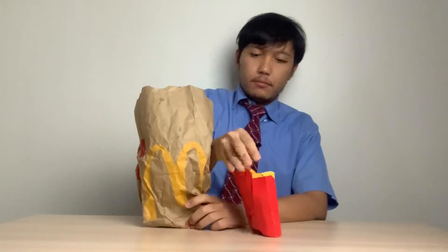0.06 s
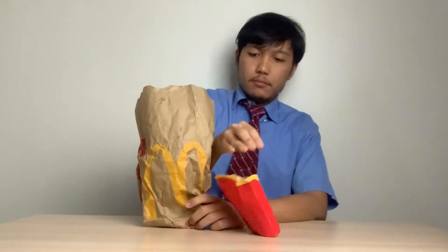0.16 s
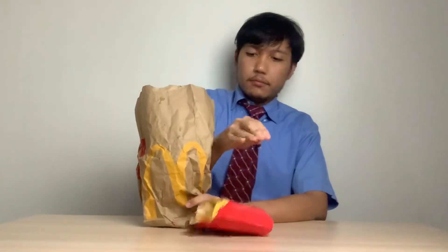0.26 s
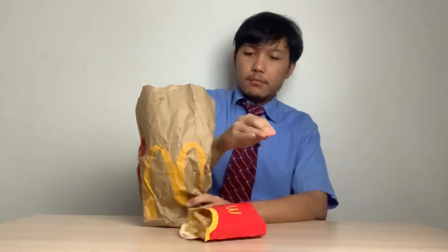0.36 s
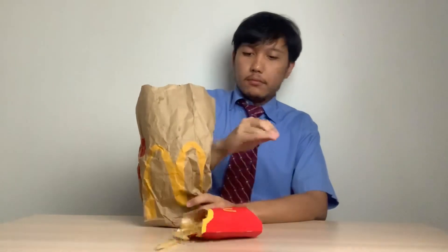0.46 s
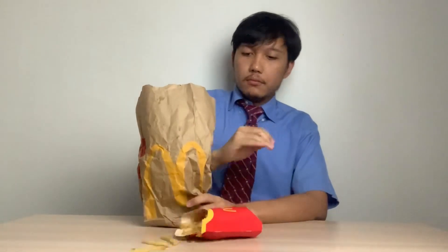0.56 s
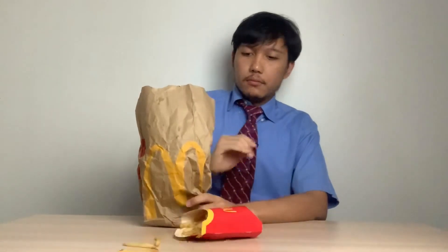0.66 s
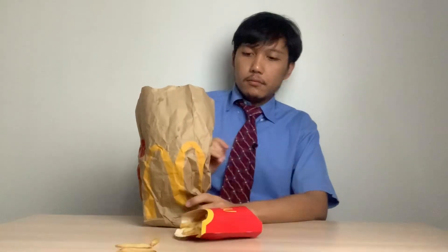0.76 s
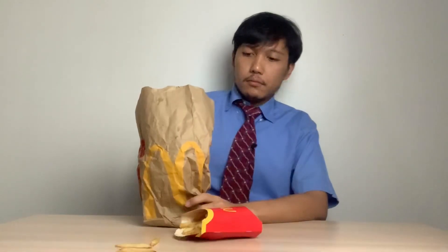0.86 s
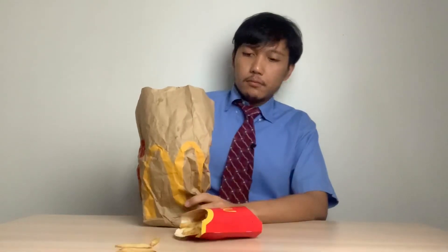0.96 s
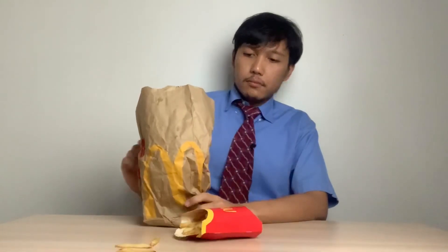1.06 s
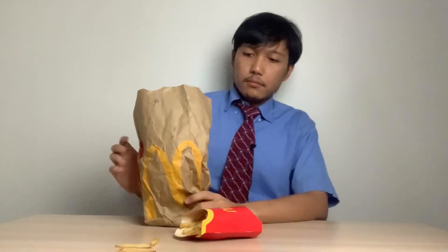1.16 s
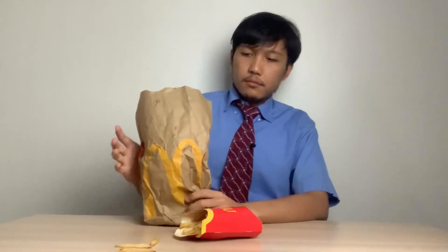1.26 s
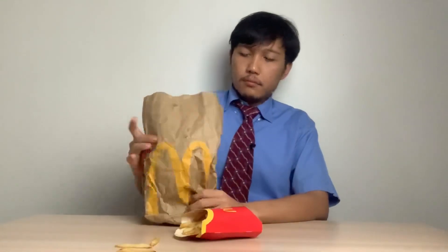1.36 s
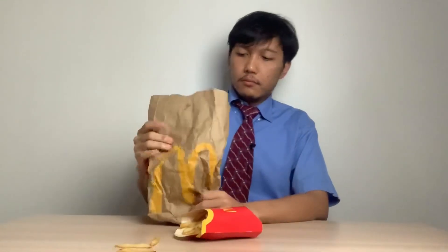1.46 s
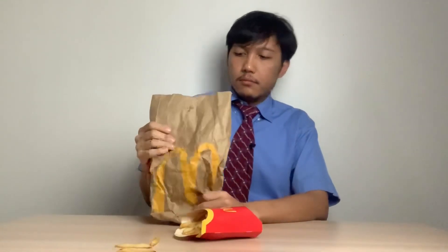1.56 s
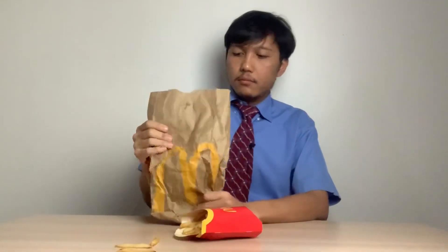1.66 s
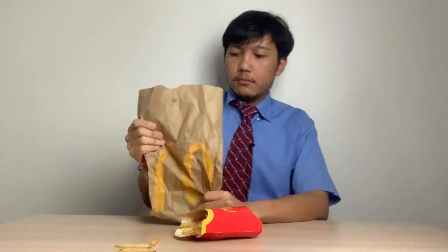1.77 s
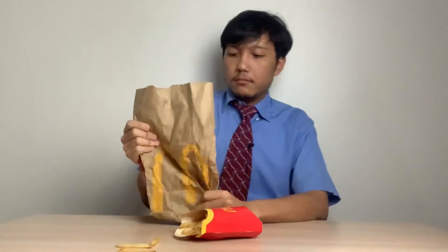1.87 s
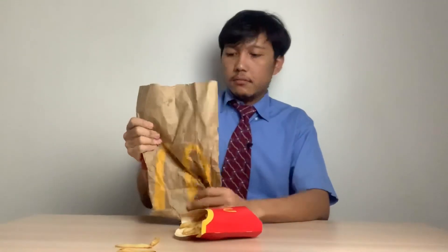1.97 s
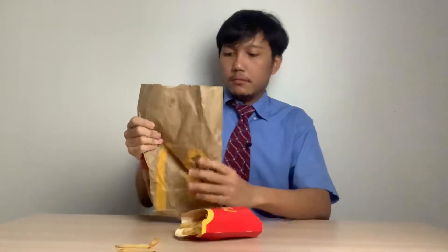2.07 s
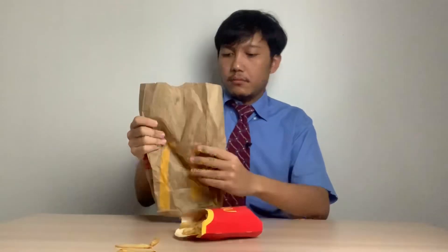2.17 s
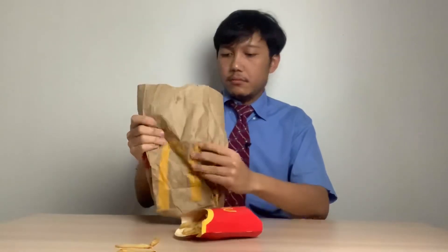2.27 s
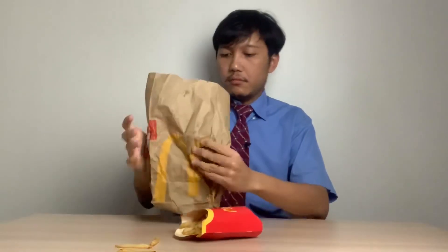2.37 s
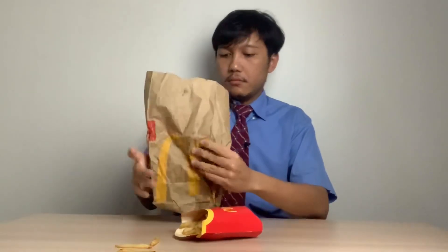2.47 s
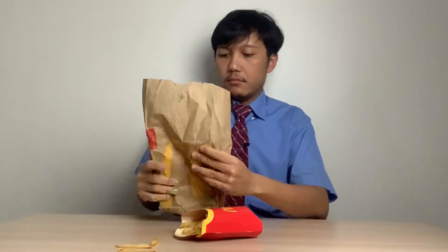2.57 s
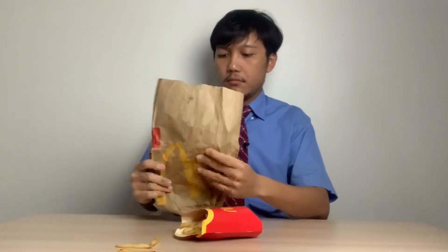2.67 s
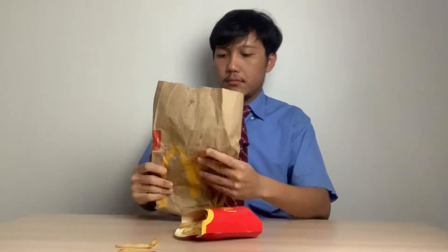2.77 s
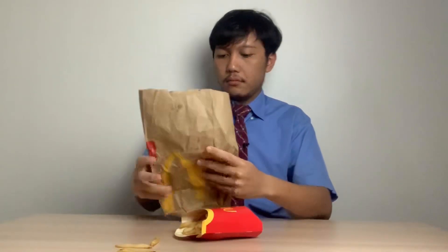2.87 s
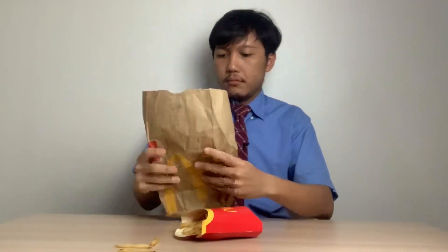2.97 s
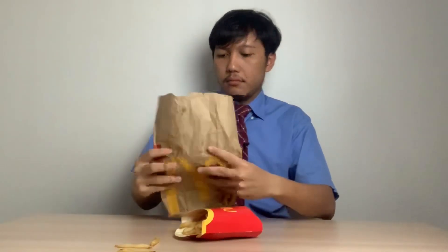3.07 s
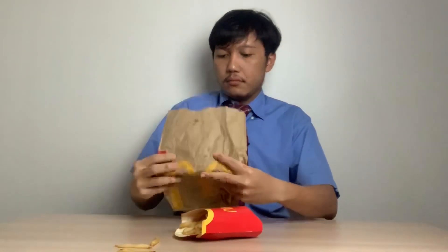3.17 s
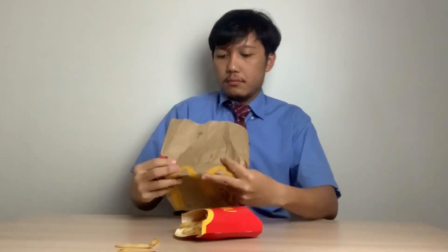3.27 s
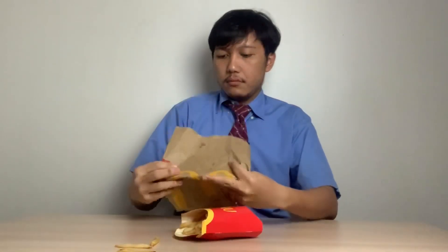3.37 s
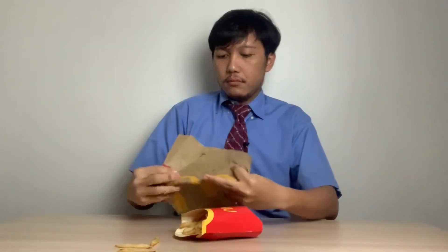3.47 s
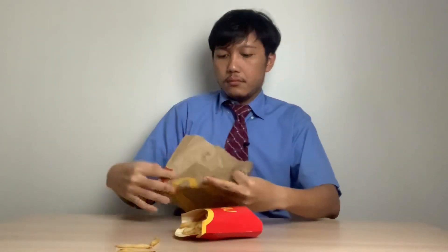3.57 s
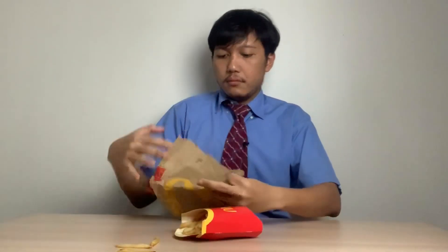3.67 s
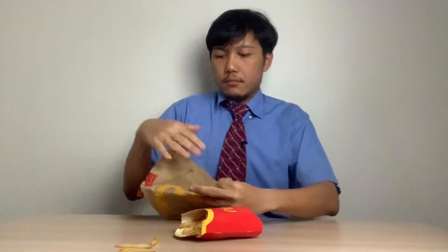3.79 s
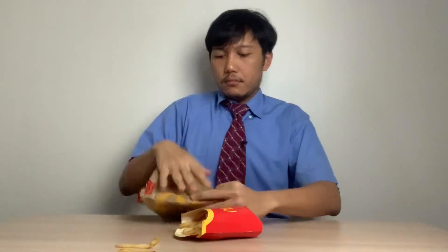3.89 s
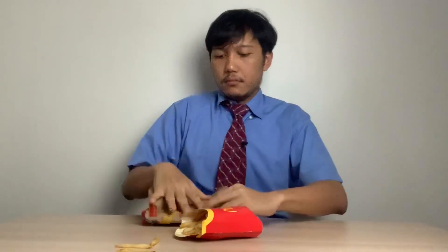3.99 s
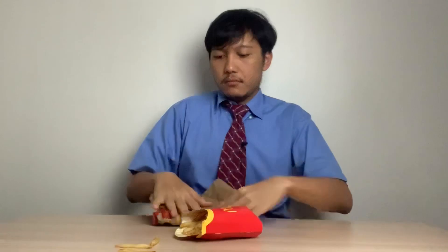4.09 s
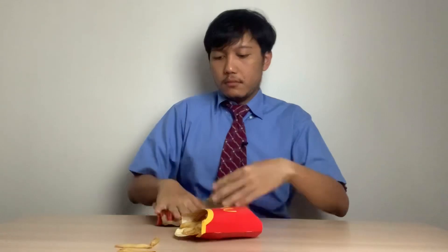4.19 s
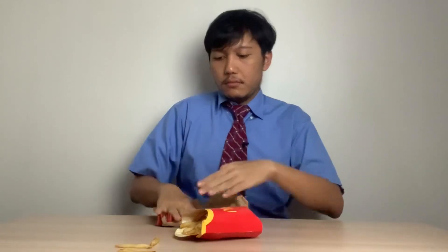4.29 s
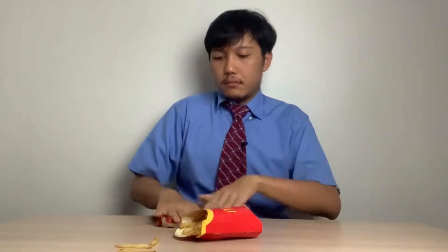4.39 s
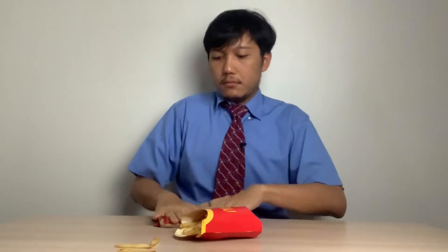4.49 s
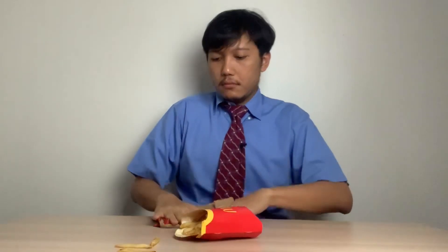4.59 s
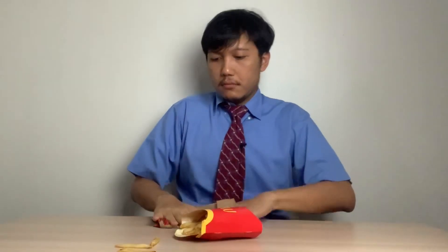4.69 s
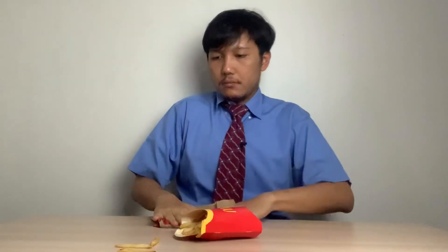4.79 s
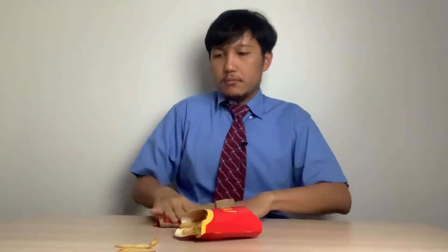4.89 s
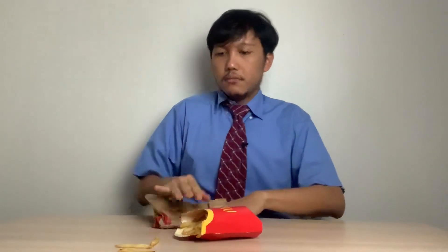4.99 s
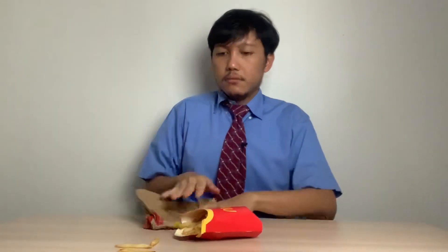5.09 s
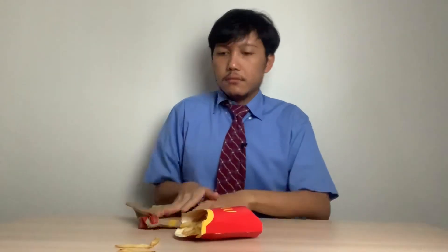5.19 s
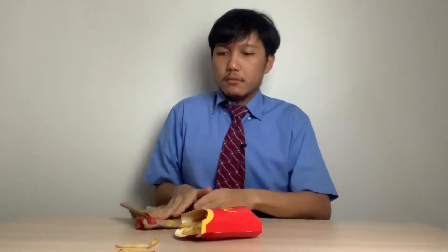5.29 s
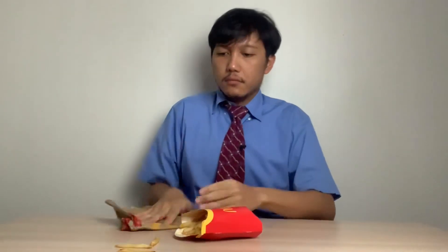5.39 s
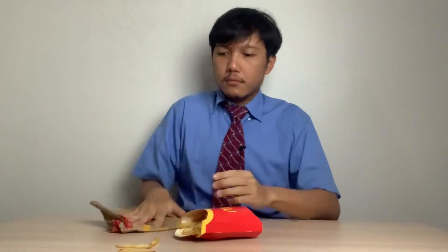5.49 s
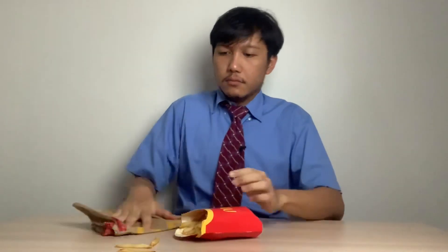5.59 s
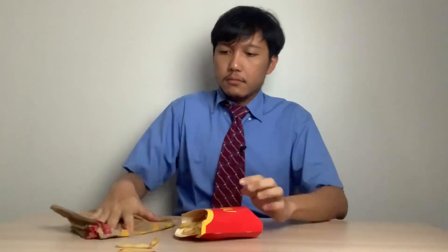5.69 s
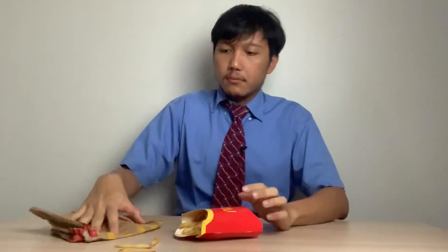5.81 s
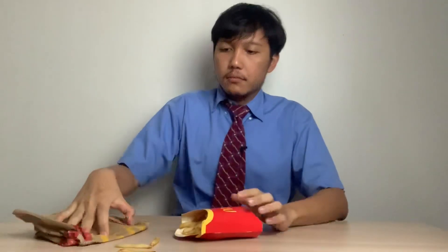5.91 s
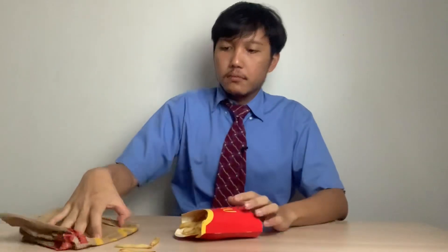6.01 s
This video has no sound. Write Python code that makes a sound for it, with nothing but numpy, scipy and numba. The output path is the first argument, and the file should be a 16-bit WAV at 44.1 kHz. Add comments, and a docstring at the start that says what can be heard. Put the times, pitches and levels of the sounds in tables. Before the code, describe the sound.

A small carton of fries topples on a wooden table with a quick papery clatter and low knock. After a near-silent pause, a stiff paper bag is grabbed with sharp snaps, crumpled in loud bursts, folded down and pressed flat with soft table thumps, then slid away with a dry rub. Small quiet room, close single microphone with bright crackle, faint low hum and rumble.

```python
"""Fries tip over, then a paper bag is folded and slid away

A carton of fries tips over on a wooden table; then a stiff paper bag is gripped, folded, pressed flat
and slid away. Short decaying tones make the creases: single snaps and dense flurries of buckles.
Others make the boom of the table and the scrape of the flat bag. A noise tail gives the paper a small room.
A sine hum, a low rumble and air noise run throughout. One microphone with a bright peak hears it all.
"""
import sys
import numpy as np
from scipy import signal
from scipy.fft import rfft, irfft, next_fast_len
from scipy.io import wavfile
from scipy.ndimage import uniform_filter1d
from numba import njit

SR = 44100
rng = np.random.default_rng(int(sys.argv[2]) if len(sys.argv) > 2 else 0)


def file_out(sig):
    """Save sig as 16-bit WAV at sys.argv[1]."""
    # one column per channel
    cols = np.atleast_2d(sig).T
    # limit, then scale
    lim = np.clip(cols, -1, 1)
    pcm = np.round(lim * 32767).astype(np.int16)
    wavfile.write(sys.argv[1], SR, pcm)


N = 266805  # length in samples

# steady low hum of an appliance: pitch_hz, rms_level_db
HUM = [(48.4, -40)]
# slowly wavering level of the low rumble: time_s, level_db
RUMBLE_LEVEL = [(0, -41.5), (.23, -40.5), (.7, -35), (.93, -44), (1.3, -32.5), (1.75, -45), (2.48, -26),
                (2.8, -35.5), (3.93, -32.5), (4.23, -36), (5.35, -30), (6.05, -30)]
# tone colour of the rumble: frequency_hz, relative_level_db
RUMBLE_COLOUR = [(10, -0.5), (20, 15), (38, 1), (50, -3), (62, -24), (90, -39.5)]
# tone colour of the air noise: frequency_hz, relative_level_db
AIR_COLOUR = [(50, 1), (80, 3), (140, 10), (300, -2), (900, -15), (2000, -32), (8000, -39), (15000, -28)]
# ringing tones of the wooden table top: pitch_hz, relative_level_db, time_to_fall_60_db_s
TABLE_MODES = [(130.6, -5, 0.64), (203, -15, 0.23), (313, -4.5, 0.061)]
# knocks on the table: start_s, level_db
KNOCKS = [(0.184, -25.5), (0.234, -20.5), (0.28, -53), (0.348, -55), (0.471, -43), (3.967, -31),
          (4.228, -31), (4.348, -31), (4.706, -38), (5.349, -31), (5.8, -41.5)]
# flattened bag scraping the table: time_s, level_db
SCRAPE_LEVEL = [(3.7, -39), (3.88, -33), (4.2, -32), (4.26, -40), (4.33, -34), (4.68, -33.5), (4.73, -46.5),
                (4.85, -38), (5.0, -41), (5.15, -35.5), (5.36, -34), (5.47, -37), (5.7, -43), (6.05, -45)]
# flurries of buckling; swell and fade set how fast the level moves by 20 dB, body is how much big folds join in:
# peak_s, peak_level_db, swell_s, fade_s, body_db
FLURRIES = [(0.249, -31, 0.031, 0.11, 2), (.347, -40.5, 0.0048, 0.3, 2.5), (.462, -38, 0.0049, 0.082, -3.5),
            (1.179, -49.5, 0.0041, 0.26, 5), (1.253, -28.5, 0.011, 0.041, 1.5),
            (1.329, -38.5, 0.0095, .08, 5.5), (1.376, -34, 0.055, 0.087, 6.5), (1.457, -33, 0.018, 0.14, 3),
            (1.526, -35.5, 0.0076, 0.15, 1), (1.636, -22.5, 0.023, 0.12, 2.5),
            (1.672, -24, 0.057, 0.058, 3.5), (1.71, -18.5, 0.037, .035, 0.5),
            (1.732, -14.5, 0.029, 0.048, -3), (1.886, -31.5, 0.12, 0.15, 0), (2.022, -44, .004, 0.04, -1),
            (2.102, -36.5, 0.17, 0.11, 1), (2.161, -41, .005, .07, 7), (2.277, -36, 0.54, 0.099, -0.5),
            (2.349, -31.5, 0.005, 0.29, 1), (2.493, -25.5, 0.023, 0.084, 0.5), (2.57, -25.5, 0.082, .04, 3),
            (2.603, -15.5, 0.062, 0.045, -0.5), (2.805, -35.5, 0.67, 0.051, 2),
            (2.92, -38, 0.15, 0.11, 2.5), (2.964, -30.5, .04, 0.47, 4.5), (2.99, -25.5, 0.044, 0.037, -2),
            (3.03, -17, 0.044, 0.051, -3), (3.072, -22.5, 0.06, 0.077, -6),
            (3.218, -22, 0.035, 0.036, -3.5), (3.27, -35.5, 0.024, .06, 2.5),
            (3.321, -30, 0.094, 0.055, 0.5), (3.386, -46, .005, .07, -8), (3.42, -34, 0.0057, .15, -20),
            (3.483, -21, 0.079, 0.096, -10), (3.541, -30.5, 0.18, 0.036, 2.5),
            (3.636, -31.5, .005, 0.087, 0), (3.772, -30, .006, 0.035, -11), (3.813, -25, 0.019, 0.14, -4),
            (3.891, -27.5, 0.086, 0.19, 3), (4.092, -22.5, 0.56, 0.22, 0.5), (4.217, -33, 0.14, 0.34, 6.5),
            (4.357, -20.5, 0.085, 0.13, 5), (4.498, -20.5, 0.096, 0.044, 1),
            (4.571, -26.5, 0.085, 0.28, 2.5), (4.648, -37, 0.15, 0.062, 4), (4.703, -35, 0.1, 0.039, 0),
            (4.815, -31.5, 0.012, 0.6, 3.5), (4.993, -30.5, 0.36, 0.51, -24),
            (5.177, -28.5, 0.062, 0.069, 1.5), (5.286, -37, .01, 0.29, 13), (5.345, -24.5, 0.2, 0.26, -12),
            (5.716, -25, 0.017, 0.043, -6)]
# quiet rubbing between flurries, as fries settle, hands hold the bag and it slides away:
# time_s, level_db, body_db
RUBBING = [(0, -57, -2), (.06, -70, 9), (.17, -64, 7), (.5, -44.5, 3.5), (.7, -61, 4), (.94, -80, 15.5),
           (1.2, -48, -1.5), (1.8, -56, -5), (2.7, -40.5, -11), (3.62, -72, 7), (4.78, -69, -27),
           (5.1, -39.5, 10), (5.25, -35, 4), (5.46, -26.5, -12), (5.72, -28, -3), (5.8, -30, -8.5),
           (6.05, -32.5, 1.5)]
# the bag goes from hollow to flat: begin_s, end_s
PRESSING_S = (3.73, 4.64)
# buckles by size, from fine creases to pushed air:
# lowest_pitch_hz, highest_pitch_hz, time_to_fall_60_db_cycles, buckles_per_s
BUCKLE_SIZES = [(2330, 19800, 6.7, 12000), (857, 2490, 6.6, 2500), (296, 800, 5.1, 900),
                (32, 206, 3.8, 200)]
# folds, panels and pushed air: level_over_fine_creases_db, share_of_body_db (plain factor), change_once_flat_db
LARGER_SIZES = [(-3, 1.16, -5), (-4, 1.36, -13.5), (-4.5, 1.46, -23.5)]
# single snaps, each level a starting point for its ring:
# start_s, snap_level_db, crease_pitch_hz, panel_level_db, panel_pitch_hz, crack_level_db
SNAPS = [(0.084, -28.5, 2550, -33, 1600, -37), (0.2212, -27, 2700, -26, 524, -50),
         (0.2324, -13, 2820, -27, 970, -33), (0.2399, -13, 2530, -22, 513, -26),
         (0.2564, -29, 5600, -17.5, 600, -42), (0.2773, -9.5, 2130, -24, 649, -45),
         (0.3462, -10, 2520, -18.5, 1100, -52), (0.4154, -28, 2370, -28, 593, -55),
         (0.46, -19, 6840, -31, 1230, -43), (1.1253, -33, 6510, -59, 301, -52),
         (1.1757, -43, 5680, -35.5, 1140, -61), (1.2501, -9.5, 2090, -30, 2000, -15),
         (1.2544, -8.5, 3770, -28, 540, -15), (1.3269, -24, 3590, -28, 444, -34),
         (1.3404, -20, 4490, -21.5, 554, -26), (1.3747, -8, 4550, -13, 1500, -16),
         (1.4029, -7.5, 2340, -25, 566, -38), (1.4574, -8, 6400, -30, 310, -40),
         (1.5229, -3.5, 4640, -41, 303, -31), (1.5354, -5, 5290, -26, 425, -14),
         (1.5658, -15, 6110, -35.5, 393, -30), (1.6076, -22, 2060, -32, 450, -41),
         (1.6279, -6, 2160, -38, 1150, -27), (1.6403, -2, 6260, -22, 1930, -22),
         (1.6524, -6, 2300, -17, 435, -29), (1.6684, -5, 6760, -19, 486, -18),
         (1.677, -1, 6150, -15, 435, 1), (1.708, -0.5, 4120, -16.5, 533, -7),
         (1.73, -2, 2270, -19, 1870, -7.5), (1.8285, -17, 2320, -29, 991, -43),
         (1.8777, -9, 6130, -21, 1420, -27), (1.8824, -15, 1980, -33, 1810, -13.5),
         (1.9081, -14, 2270, -39, 1170, -25), (2.0211, -11, 4940, -22.5, 815, -16.5),
         (2.1596, -8, 2860, -24, 514, -23), (2.1658, -7, 5550, -21, 480, -20),
         (2.2204, -19, 5410, -26, 554, -32), (2.2371, -8, 6620, -41, 1640, -26),
         (2.2558, -8.5, 7400, -32, 557, -12.5), (2.2847, -11.5, 3420, -32, 756, -39),
         (2.3464, -21, 2620, -17.5, 468, -43), (2.358, -12.5, 6700, -22, 1370, -36),
         (2.4104, -7.5, 6650, -27, 372, -26), (2.5392, -5.5, 4070, -25, 345, -13),
         (2.5683, -1, 4240, -29, 326, -8), (2.591, 0, 3140, -11, 980, -4),
         (2.6044, -7, 6500, -13.5, 484, -16), (2.7501, -17, 2080, -19, 1150, -24),
         (2.7746, -6.5, 7040, -24, 1720, -17), (2.7984, -8.5, 4340, -41, 570, -29),
         (2.809, -8, 2600, -49, 404, -16), (2.8895, -10.5, 5700, -16, 1600, -32),
         (2.9351, -15, 6990, -41, 316, -29), (2.9577, -9, 6700, -17, 1550, -21),
         (2.9875, -3, 6600, -32, 573, -11), (3.014, -5, 4100, -16.5, 610, -10),
         (3.021, 1.5, 5600, -19, 1510, -15), (3.033, -1, 6700, -16, 1840, -10),
         (3.0525, -8, 5550, -14, 673, -9), (3.0724, -1, 6400, -13, 1550, -9),
         (3.1093, -7.5, 6600, -27, 540, -32), (3.185, -10.5, 3830, -34, 477, -33),
         (3.2061, -19, 5370, -23, 460, -20), (3.245, -6, 2750, -39, 2000, -39),
         (3.2603, -5, 4270, -25, 533, -18), (3.2773, -10, 2450, -23, 611, -10),
         (3.2989, -15, 6620, -30, 520, -36), (3.3204, -11.5, 2930, -17.5, 1100, -33),
         (3.385, -9.5, 2680, -36, 1720, -41), (3.4176, -8, 4320, -34, 617, -33),
         (3.429, -9.5, 5220, -38.5, 1600, -27), (3.4411, -7, 4830, -37, 1030, -10),
         (3.488, 1, 6860, -26, 1220, -18), (3.5382, -4, 6260, -33, 880, -11),
         (3.6343, -11, 6320, -36, 1010, -30), (3.6646, -11, 3020, -33, 374, -47.5),
         (3.771, -9, 6690, -37, 993, -25), (3.8034, -7.5, 3540, -19, 804, -27),
         (3.8222, -15, 7000, -30.5, 985, -16), (3.8473, -3.5, 7100, -35, 1090, -11.5),
         (3.8802, -2, 6620, -23, 947, -10), (3.8934, -4.5, 6900, -22, 2000, -17),
         (3.9629, -8, 6820, -15.5, 996, -20), (4.0094, -24, 6940, -37, 662, -32),
         (4.0494, -12, 7040, -27, 580, -14), (4.1264, -6.5, 6660, -23, 982, -12),
         (4.1609, -3.5, 6650, -14, 1190, -21), (4.2083, -11, 6680, -3, 1010, -17),
         (4.2283, -10, 2060, -8, 1440, -22), (4.2423, -9.5, 2530, -36, 861, -19),
         (4.3201, -5, 3230, -13.5, 1180, -14), (4.3474, -5.5, 4200, -17, 312, -11),
         (4.3591, 0.5, 7200, -21, 1730, -11), (4.4069, -3.5, 2380, -22, 494, -17),
         (4.4267, -4, 6850, -9, 1440, -25), (4.4613, -6, 2540, -11, 1220, -18),
         (4.4817, -7, 4660, -11, 1460, -8.5), (4.567, -3, 4470, -8, 1140, -11.5),
         (4.591, -8, 6940, -37, 1580, -23), (4.6448, -12, 3140, -30, 1260, -23),
         (4.6824, -7, 3370, -30, 1390, -14), (4.7013, -6.5, 6700, -36, 1460, -18),
         (4.7102, -15.5, 2800, -42, 1050, -17), (4.75, -15, 4800, -43, 1080, -31),
         (4.8145, -13.5, 7130, -39, 1370, -30), (4.8274, -8.5, 5970, -21, 1490, -26),
         (4.8835, -9.5, 2280, -27, 1780, -14.5), (5.1487, -32, 6260, -17, 1480, -31),
         (5.176, -4, 5310, -30, 1810, -14), (5.1854, -13, 5610, -21, 1230, -21),
         (5.2842, -8, 6960, -33, 1280, -19), (5.3504, -16, 6020, -20, 1060, -19),
         (5.7144, -17, 6610, -32, 1440, -15), (5.7178, -25, 6820, -36, 1480, -30),
         (6.0104, -16, 5940, -26, 720, -27.5)]
# tone colour of the microphone: frequency_hz, gain_db
MIC_COLOUR = [(20, -3.5), (3000, -2.5), (5500, 0.5), (6600, 2), (7600, 8), (8400, 0.5), (9500, -6),
              (11700, -17.5), (14000, -32), (16000, -27)]

AIR_DB, HISS_DB = -58.5, -70  # rms, the hiss before the final treble cut
ROOM_T60_LOW_S, ROOM_T60_HIGH_S, ROOM_DB = 0.13, 0.073, -19  # time to fall 60 dB; tail level
POCKET_HZ, POCKET_RISE_HZ_PER_S = 1157, 142  # the air pocket shrinks, so its pitch rises
UNEVEN_HOLLOW_DB, UNEVEN_FLAT_DB, UNEVEN_RUB_DB = 4, 2.5, -3.6  # spread of buckle sizes
ROUNDNESS = 1.128  # above 1: a flurry has a flatter top and steeper ends
CLIP = 0.85  # largest level the microphone passes
TOP_HZ = 15900  # edge of the steep treble cut


def undb(db):
    """Turn decibels into a plain gain."""
    return 10 ** (np.asarray(db) / 20)


def unit(x):
    """Scale a sound to rms 1."""
    return x / np.sqrt(np.mean(x ** 2))


def curve(table):
    """Draw straight lines between the table rows, one value per sample for each column."""
    s, *columns = np.transpose(table)
    return [np.interp(np.arange(N) / SR, s, column) for column in columns]


def log_gain(colour, size):
    """Natural log of the gain of a tone colour, at each frequency of a transform."""
    hz, db = np.transpose(colour)
    bin_hz = np.arange(size // 2 + 1) * SR / size
    return np.log(undb(np.interp(np.log(bin_hz + 1), np.log(hz), db)))


def noise(colour):
    """Steady noise of a given tone colour, rms 1."""
    size = next_fast_len(N)
    spectrum = rfft(rng.standard_normal(size)) * np.exp(log_gain(colour, size))
    return unit(irfft(spectrum, size)[:N])


def coloured(x, colour, size=2048):
    """Filter a sound with a given tone colour, without any ringing ahead of a sound."""
    cepstrum = irfft(log_gain(colour, size), size)
    # folding the second half onto the first makes the filter act only after its input
    cepstrum[1:size // 2] *= 2
    cepstrum[size // 2 + 1:] = 0
    response = irfft(np.exp(rfft(cepstrum)), size)
    return signal.fftconvolve(x, response)[:N]


@njit
def rings(count, start, hz, t60, size, rise, sr):
    """Add up decaying sines, each swelling over its first cycles."""
    out = np.zeros(count)
    for k in range(len(start)):
        # a shrinking turn in the complex plane: one multiplication moves the sine on by a sample
        turn = np.exp(2j * np.pi * hz[k] / sr - np.log(1000) / (t60[k] * sr))
        swell_step = np.exp(-hz[k] / (rise * sr))
        z = size[k] + 0j
        gap = 1.
        for i in range(start[k], min(count, start[k] + int(t60[k] * sr))):
            gap *= swell_step
            out[i] += z.imag * (1 - gap)
            z *= turn
    return out


def ring(s, hz, t60, size, rise=0.11):
    """Decaying tones starting at times s, with t60 in seconds and rise in cycles."""
    start = (s * SR).astype(np.int64)
    return rings(N, start, 1. * hz, 1. * t60, 1. * size, max(rise, .05), 1. * SR)


def steady(x, seconds):
    """Even out the slow level of a sound but keep its grain."""
    span = int(SR * seconds)
    power = uniform_filter1d(uniform_filter1d(x ** 2, span), span)
    return x / np.sqrt(power + 1e-12)


def background():
    """Steady sine hum, wavering low rumble and faint steady air noise."""
    t = np.arange(N) / SR
    # a sine peaks at root 2 times its rms
    hum = sum(undb(db) * np.sqrt(2) * np.sin(2 * np.pi * hz * t) for hz, db in HUM)
    rumble = undb(curve(RUMBLE_LEVEL)[0]) * noise(RUMBLE_COLOUR)
    air = undb(AIR_DB) * noise(AIR_COLOUR)
    return hum + rumble + air


def room(x):
    """Scattered echoes of a small bare room: fading noise, with the treble dying sooner."""
    t = np.arange(SR) / SR
    spray = rng.standard_normal(SR) * np.clip((t - .004) / 0.031, 0, 1)
    low = signal.sosfilt(signal.butter(1, 2000, fs=SR, output="sos"), spray)
    high = spray - low
    tail = low * 1000. ** (-t / ROOM_T60_LOW_S) + high * 1000. ** (-t / ROOM_T60_HIGH_S)
    tail = tail / np.sqrt(np.sum(tail ** 2))
    return signal.fftconvolve(x, tail)[:N] * undb(ROOM_DB)


def table():
    """Knocks set the low tones of the wooden top ringing."""
    s, db = np.transpose(KNOCKS)
    return sum(ring(s, hz + 0 * s, t60 + 0 * s, undb(db + mode_db)) for hz, mode_db, t60 in TABLE_MODES)


def scrape():
    """Fibres catch and slip; each slip rings the hollow pocket under the hand, at a slightly varied pitch."""
    begin_s = SCRAPE_LEVEL[0][0]
    when, detune, strength = rng.random((12000, 3)).T
    at = (when * N).astype(int)
    pocket_hz = POCKET_HZ + POCKET_RISE_HZ_PER_S * np.maximum(at / SR - begin_s, 0)
    hz = pocket_hz * 2 ** (.5 * (detune - .5))  # up to a quarter octave either way
    size = undb(-2.2 * np.log(1 - strength))
    slips = ring(at / SR, hz, 8.7 / hz, size, rise=2.6)
    touching = np.clip((np.arange(N) / SR - begin_s) / 0.12, 0, 1)
    return touching * undb(curve(SCRAPE_LEVEL)[0]) * steady(slips, 0.21)


def flurries(body_share):
    """Power of all flurries and of the rubbing; body_share lets the body column through."""
    t = np.arange(0, N / SR + .002, .001)  # a coarse clock is enough for slow levels
    peak_s, peak_db, swell_s, fade_s, body_db = np.transpose(FLURRIES)[:, :, None]
    before = (peak_s - t) / np.maximum(swell_s, .002)
    after = (t - peak_s) / np.maximum(fade_s, .005)
    away = np.where(t < peak_s, before, after)
    burst_db = peak_db + body_share * body_db - 20 * away ** ROUNDNESS
    burst = np.sum(undb(burst_db) ** 2, axis=0)
    s, rub_db, rub_body_db = np.transpose(RUBBING)
    rub = undb(np.interp(t, s, rub_db + body_share * rub_body_db)) ** 2
    return np.array([np.interp(np.arange(N) / SR, t, power) for power in (burst, rub)])


def rustle():
    """Swarms of buckles of four sizes; when the sheet gives way, all sizes jump together."""
    flat = np.interp(np.arange(N) / SR, PRESSING_S, (0, 1))  # 0 hollow, 1 flat
    burst, rub = flurries(0)
    burst_uneven_db = UNEVEN_HOLLOW_DB + (UNEVEN_FLAT_DB - UNEVEN_HOLLOW_DB) * flat
    uneven_db = (burst * burst_uneven_db + rub * UNEVEN_RUB_DB) / (burst + rub)
    levels_db = [10 * np.log10(burst + rub)]
    for over_db, share, change_db in LARGER_SIZES:
        power = flurries(share).sum(axis=0)
        levels_db.append(10 * np.log10(power) + over_db + change_db * flat)
    # the sheet yields suddenly, about 250 times a second, and settles within milliseconds
    chance, depth = rng.random((N, 2)).T
    yields = -np.log(1 - depth) * (chance < 250 / SR)
    giving_way = signal.lfilter([1], [1, -np.exp(-1 / (0.0068 * SR))], yields)
    out = 0
    for (low_hz, high_hz, cycles, rate), db in zip(BUCKLE_SIZES, levels_db):
        when, pitch, strength, sign = rng.random((int(rate * N / SR), 4)).T
        at = (when * N).astype(int)
        hz = low_hz * (high_hz / low_hz) ** pitch
        # few large buckles among many small ones; an even rub has no large ones
        excess = np.minimum(0.69 * giving_way[at] - 0.12 * np.log(1 - strength), 3.5)
        size = undb(np.maximum(uneven_db[at], 0) * excess) * (sign - .5)
        swarm = ring(at / SR, hz, cycles / hz, size * hz ** 0.51, rise=0.8)
        out = out + undb(db) * steady(swarm, 0.19 + 6 / low_hz)
    return out


def snaps():
    """A crease flips: a short ring, a bright crack, a tight spray of neighbours and a hollow panel thud."""
    s, snap_db, crease_hz, panel_db, panel_hz, crack_db = np.transpose(SNAPS)
    crease = ring(s, crease_hz, 9.9 / crease_hz + 0.0008, undb(snap_db - 2), rise=0.22)
    crack = ring(s, 8200 + 0 * s, 0.0016 + 0 * s, undb(crack_db + 6), rise=0.27)
    # raised because a short thud peaks well above its mean level
    thud = ring(s, panel_hz, 8.4 / panel_hz, undb(panel_db + 6), rise=0.32)
    out = crease + crack + thud
    chance = rng.random((len(s), 36, 3))  # 36 neighbours for each snap
    for late, pitch, size in np.moveaxis(chance, 0, 2):
        hz = 1500 + 14000 * pitch ** 1.4
        # many neighbours follow closely, weaker ones trail up to 14 ms behind
        neighbour_s = s + 0.014 * late ** 3.2
        neighbour_size = undb(snap_db - 8.5 - 3.9 * late) * (2 * size - 1)
        out += ring(neighbour_s, hz, 17.0 / hz, neighbour_size, rise=1.0)
    return out


def scene():
    """Paper and its room tail, table knocks and background at one point."""
    paper = rustle() + snaps() + scrape()
    mono = paper + room(paper) + table() + background()
    return np.array([mono, mono])


def record(dry):
    """One microphone feeds both channels: bright peak, falling top, own hiss, clipping, steep treble cut."""
    x = coloured(dry[0], MIC_COLOUR) + undb(HISS_DB) * rng.standard_normal(N)
    clipped = np.clip(x, -CLIP, CLIP)
    x = signal.sosfilt(signal.ellip(10, .2, 60, TOP_HZ, fs=SR, output="sos"), clipped)
    return np.array([x, x])


dry = scene()
out = record(dry)
file_out(out)
```